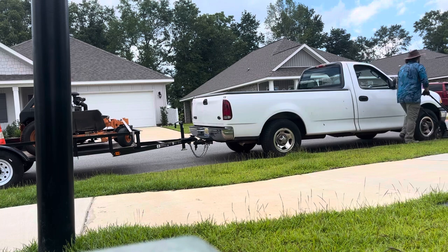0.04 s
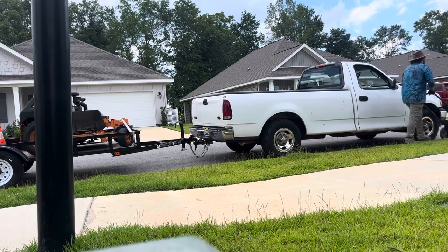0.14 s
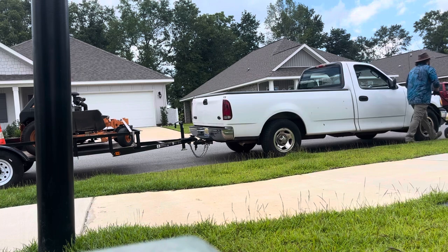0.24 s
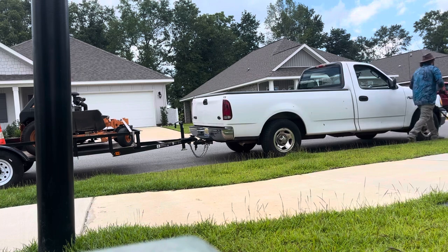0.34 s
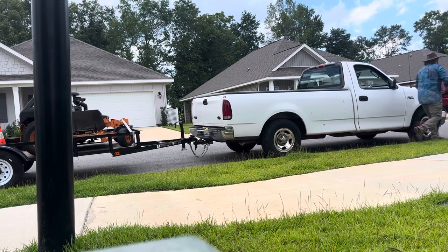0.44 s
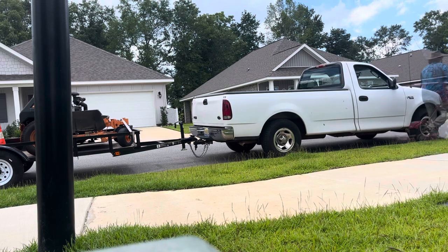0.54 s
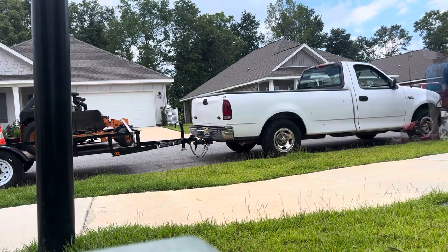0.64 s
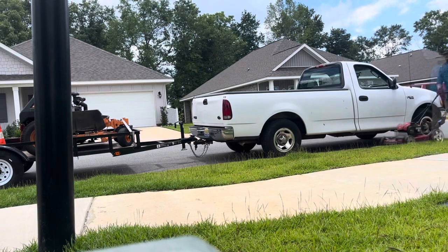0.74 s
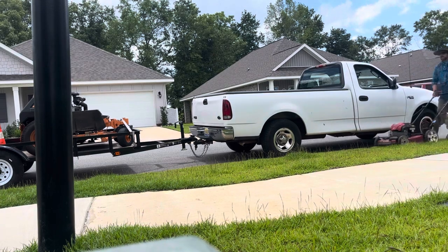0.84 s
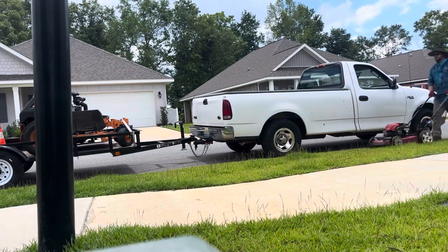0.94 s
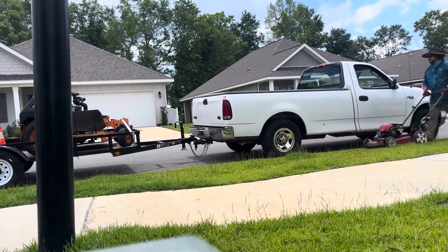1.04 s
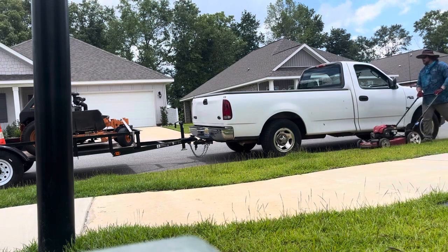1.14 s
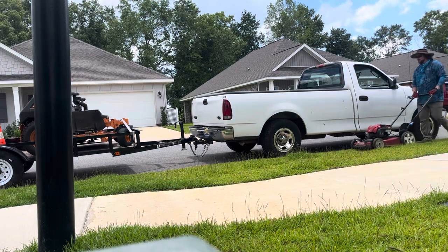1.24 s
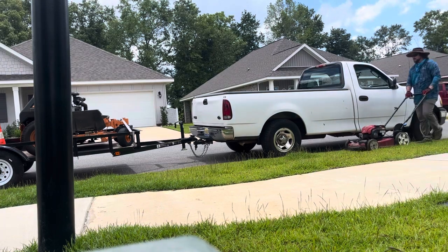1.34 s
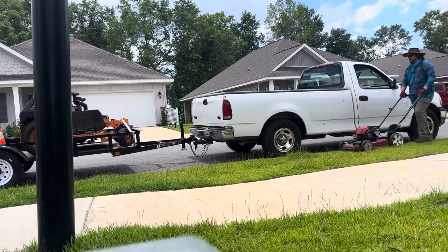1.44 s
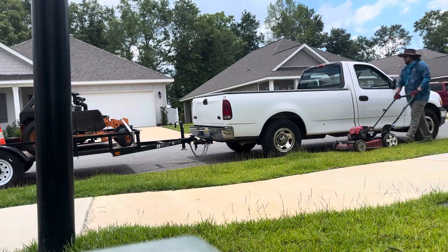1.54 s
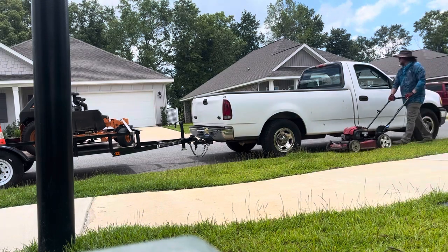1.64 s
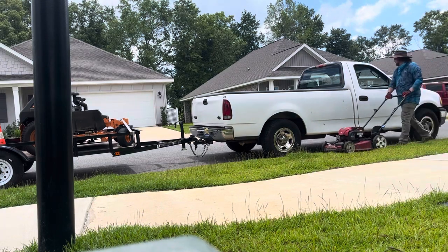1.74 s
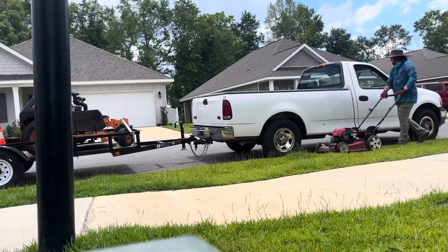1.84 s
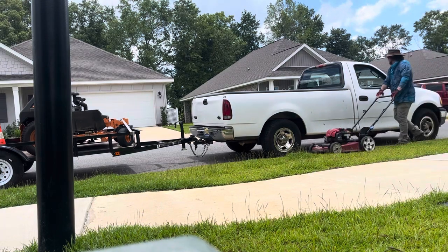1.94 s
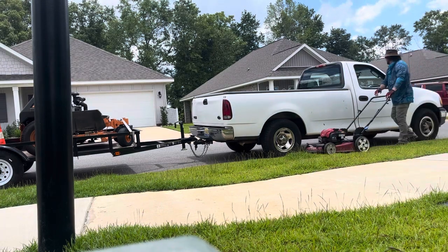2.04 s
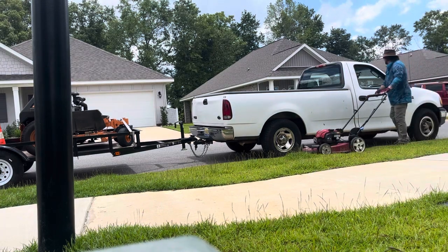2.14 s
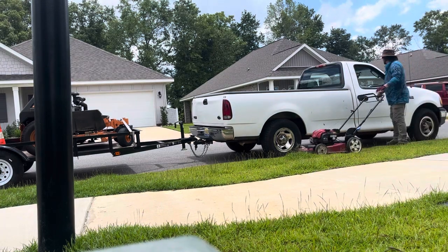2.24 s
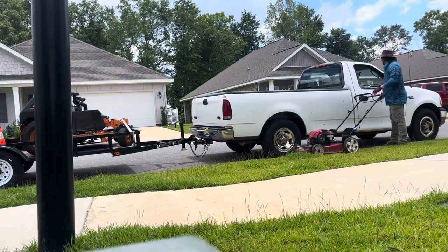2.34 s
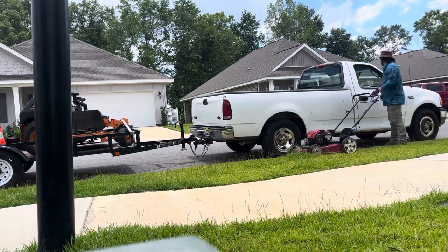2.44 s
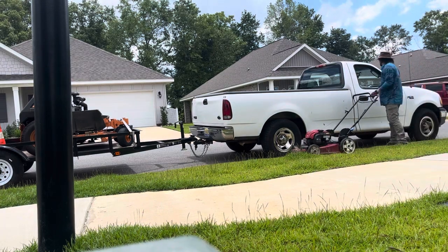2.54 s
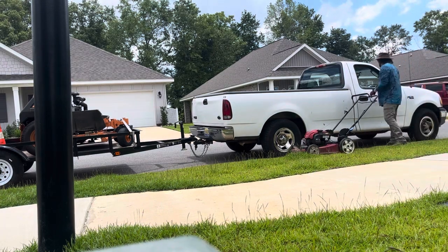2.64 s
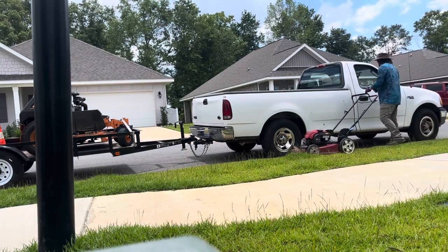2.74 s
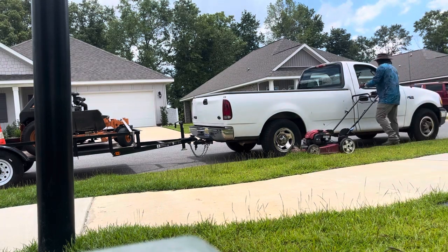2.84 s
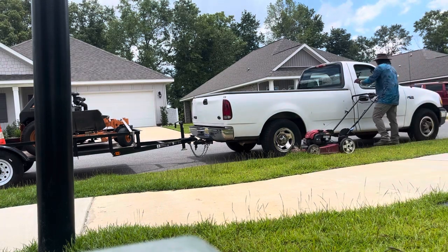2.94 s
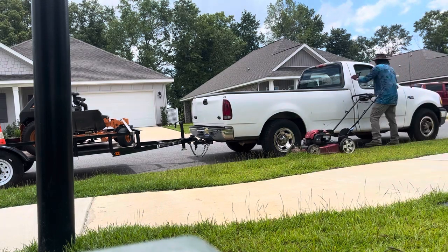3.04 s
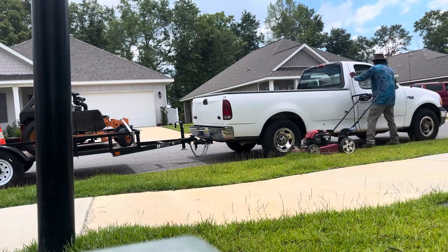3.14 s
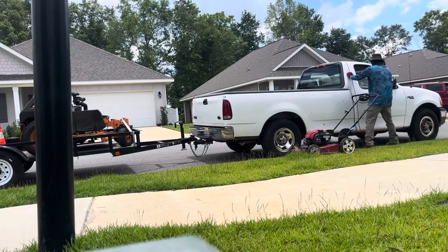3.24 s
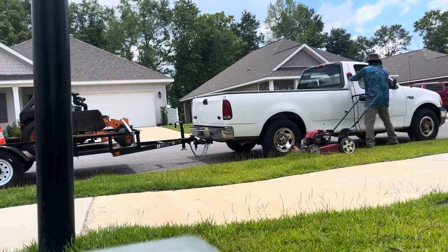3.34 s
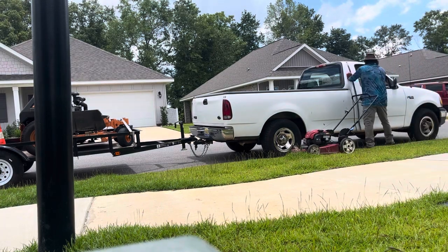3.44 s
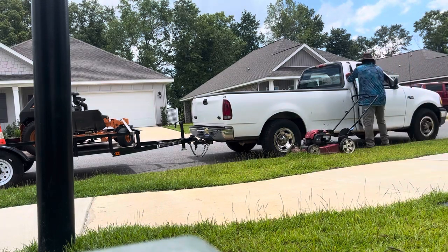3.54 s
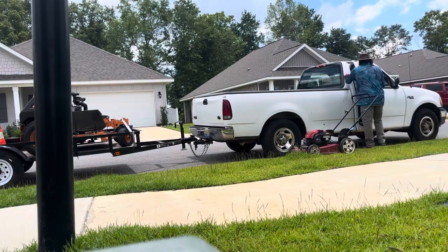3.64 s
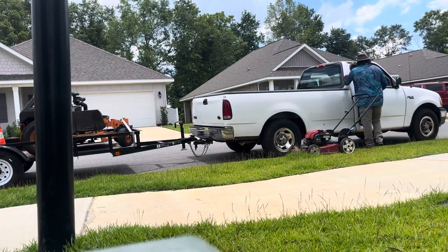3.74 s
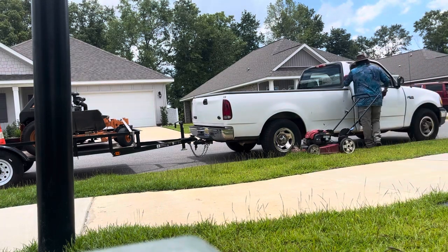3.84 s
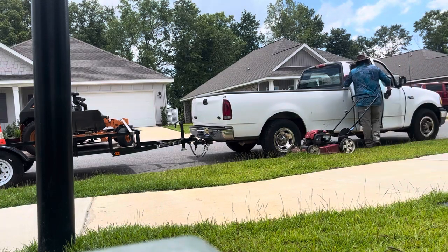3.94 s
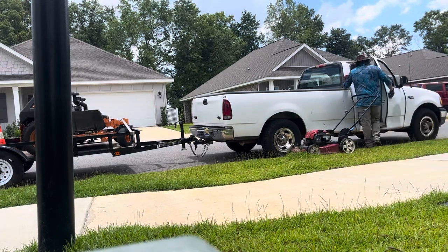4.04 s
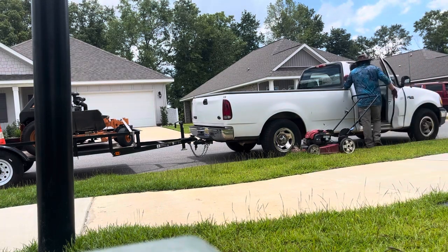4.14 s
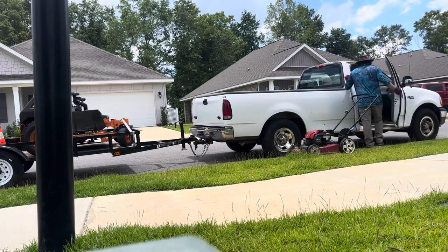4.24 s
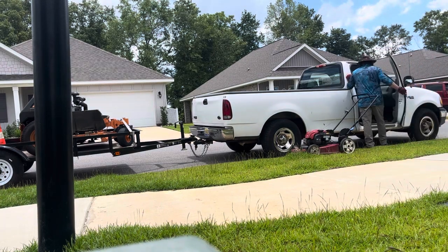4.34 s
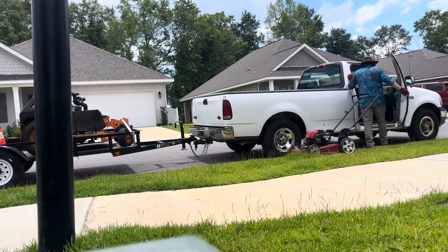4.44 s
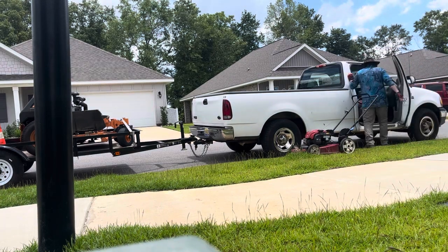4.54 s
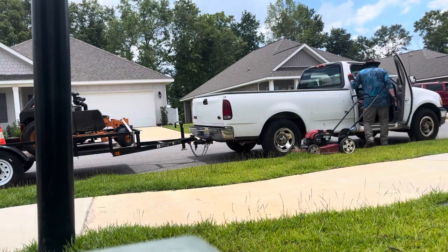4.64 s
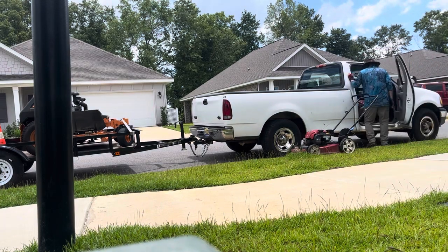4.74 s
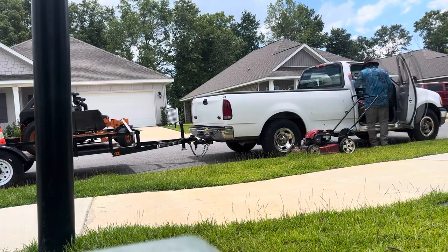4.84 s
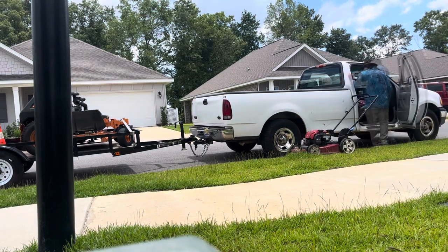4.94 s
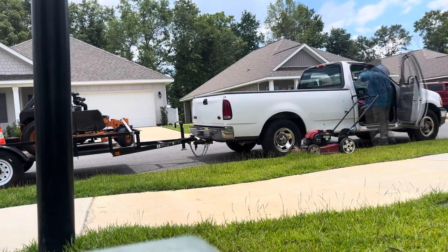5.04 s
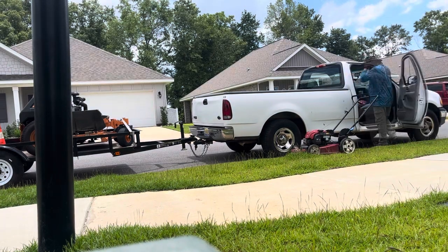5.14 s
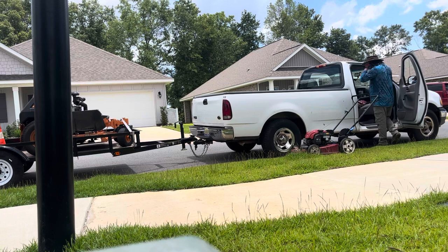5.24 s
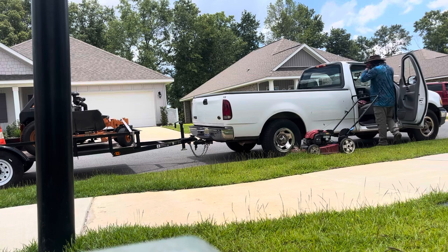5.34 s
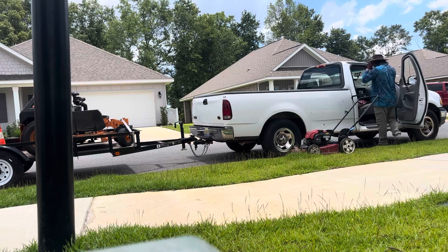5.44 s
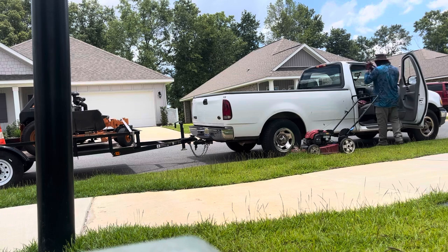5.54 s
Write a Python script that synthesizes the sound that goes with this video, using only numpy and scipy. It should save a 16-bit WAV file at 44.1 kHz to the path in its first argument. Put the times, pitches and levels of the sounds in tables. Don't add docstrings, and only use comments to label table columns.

```python
import sys
import numpy as np
from scipy import signal
from scipy.fft import rfft, irfft, next_fast_len
from scipy.io import wavfile
from scipy.ndimage import uniform_filter1d

SR = 44100
rng = np.random.default_rng(int(sys.argv[2]) if len(sys.argv) > 2 else 0)


def output_pcm(signal):
    pcm = np.clip(np.atleast_2d(signal).T, -1, 1) * 32767
    wavfile.write(sys.argv[1], SR, np.round(pcm).astype(np.int16))


def level_to_linear(level):
    exponent = np.asarray(level, float) / 20
    return 10 ** exponent


N = 246513
T = np.arange(N) / SR
SIZE = next_fast_len(N + SR // 10)
HZ = np.fft.rfftfreq(SIZE, 1 / SR)
CUT_AT, STOP_AT = 2.28, 3.38


def evened(x):
    return x / np.sqrt(np.mean(x ** 2) + 1e-20)


def read(points, hz):
    f, value = np.transpose(points)
    return np.interp(np.log(hz + 1), np.log(f + 1), value)


def colour(x, points):
    return irfft(rfft(x, SIZE) * level_to_linear(read(points, HZ)), SIZE)[:N]


def hiss(points, lo_hz, hi_hz):
    z = rfft(rng.standard_normal(SIZE)) * level_to_linear(read(points, HZ))
    band = z[(HZ > lo_hz) & (HZ < hi_hz)]
    inside = np.sqrt(2 * np.sum(abs(band) ** 2)) / SIZE
    return irfft(z / inside, SIZE)[:N]


def drift(top_hz):
    rate = 200
    coarse = rng.standard_normal(int(N / SR * rate) + 2)
    low_pass = signal.butter(2, np.clip(top_hz, .1, 90), fs=rate)
    smooth = evened(signal.filtfilt(*low_pass, coarse))
    return np.interp(T, np.arange(len(coarse)) / rate, 2.2 * np.tanh(smooth / 2))


def narrow(x, hz, width_hz):
    peak = signal.iirpeak(hz, hz / width_hz, SR)
    return evened(signal.lfilter(*peak, signal.lfilter(*peak, x)))


def ramp(at, length):
    return np.sin(np.pi / 2 * np.clip((T - at) / length + .5, 0, 1)) ** 2


def bump(cycles, place, length):
    since = (cycles - place) % 1
    return (1 - np.exp(-since / 0.0085)) * np.exp(-since / length)


# pitch_hz, level_db (per Hz)
STREET_SPECTRUM = [(20, -27), (39, -4), (62, -14), (160, -8), (250, -15.5), (400, -20.5), (630, -29.5),
                   (1000, -31.5), (2000, -38), (3200, -46.5), (5000, -43.5), (7000, -56.5), (10000, -52),
                   (14500, -70.5), (16000, -55)]
# pitch_hz, likeness (0-1)
STREET_LIKENESS = [(60, 0.92), (150, 0.92), (380, 0.6), (950, 0.016), (2380, 0.39), (5980, 0.048),
                   (15000, 0.42)]
# pitch_hz, left_minus_right_db
STREET_LEAN = [(60, -6), (130, 2.5), (290, 2), (640, 0), (1410, 1.5), (3100, -5.5), (6820, -7), (15000, 5)]


def traffic_wash():
    frames, hz = N // 512 + 5, np.fft.rfftfreq(2048, 1 / SR)
    a, b, c, d, patches = rng.standard_normal((frames, 1025, 5)).T
    patches = uniform_filter1d(patches, size=3, axis=0)
    patches = evened(uniform_filter1d(patches, size=16, axis=1))
    same = np.clip(read(STREET_LIKENESS, hz), -1, 1)[:, None]
    left = a + 1j * b
    right = same * left + np.sqrt(1 - same ** 2) * (c + 1j * d)
    lean_db = read(STREET_LEAN, hz)[:, None] / 2
    level_db = read(STREET_SPECTRUM, hz)[:, None] + 2.0 * patches
    z = np.array([left, right]) * level_to_linear(level_db + np.array([lean_db, -lean_db]))
    return evened(signal.istft(z, nperseg=2048, noverlap=1536)[1][:, :N])


# pitch_hz, level_db
IDLE_TONES = [(56, 3.5), (77, 3), (120, -1.5), (150, -16)]


def far_idle():
    idle = np.zeros(N)
    for hz, db in IDLE_TONES:
        idle += level_to_linear(db + 2.5 * drift(5)) * np.sin(2 * np.pi * hz * T + 1.2 * drift(4))
    return idle


def street():
    lull_at, swell_s = 5.06, 1.22
    swell_db = -1.5 * np.cos(2 * np.pi * (T - lull_at) / swell_s)
    return level_to_linear(-50.5 + 0.59 * swell_db) * traffic_wash() + level_to_linear(-50 + swell_db) * far_idle()


def insect():
    swell_db = 3.5 * np.exp(-((T - 4.3) / .5) ** 2)
    level = level_to_linear(-75.5 + swell_db + 1.5 * drift(8))
    trill = level * np.sin(2 * np.pi * 4160 * T + 0.76 * drift(25))
    return trill * np.array([[-.3], [1]])


# start_s, level_db
LATCH_CLICKS = [
    (3.9746, -34),
    (3.9773, -20.5),
]
# pitch_hz, level_db, t60_s
DOOR_MODES = [(196, -29.5, 0.22), (260, -34, 0.44), (281, -25, .15), (361, -36.5, 0.3), (453, -35.5, 0.21),
              (515, -29, 0.096)]
# pitch_hz, t60_s
BODY_DECAY = [(200, 0.82), (1000, 0.33), (3000, 0.26), (6000, 0.15), (11000, 0.2)]
# pitch_hz, level_db
CLICK_SPECTRUM = [(150, 10.5), (500, -1), (1200, -1), (2300, -5.5), (3500, -8.5), (5000, -13), (6500, -2),
                  (8000, -18), (11000, -20), (15000, -31)]


def latch():
    out = np.zeros(N)
    (tick_at, _), (catch_at, catch_db) = LATCH_CLICKS
    hz, after, z = signal.stft(rng.standard_normal(SR // 2), SR, nperseg=128)
    wash_db = read(CLICK_SPECTRUM, hz)[:, None] - 60 * after / read(BODY_DECAY, hz)[:, None]
    wash = signal.istft(z * level_to_linear(wash_db), SR, nperseg=128)[1]
    wash = wash / abs(wash).max()
    out[round(catch_at * SR):][:len(wash)] += level_to_linear(catch_db - 9 + 1.4 * drift(45)[:len(wash)]) * wash
    rebound_at, rebound_db = catch_at + .15, -19
    out[round(rebound_at * SR):][:len(wash)] += level_to_linear(catch_db - 8 + rebound_db) * wash

    rattle = hiss(CLICK_SPECTRUM, 1000, 11000)
    for s, db in LATCH_CLICKS:
        since = np.maximum(T - s, 0)
        out += level_to_linear(db - 7.5) * (1 - np.exp(-since / 0.00015)) * np.exp(-since / 0.0025) * rattle

    since = np.maximum(T - tick_at - .005, 0)
    for hz, db, t60 in DOOR_MODES:
        out += level_to_linear(db - 60 * since / t60) * (1 - np.exp(-since / 0.0048)) * np.sin(2 * np.pi * hz * since)
    return out


# start_s, rate_hz
BLADE_SPEED = [(0, 92.6), (.4, 94.45), (.85, 93.33), (1.05, 94.7), (1.4, 92.5), (1.7, 94.77), (1.95, 93.54),
               (2.15, 94.4)]


def spin():
    cut_hz, coast_s, friction_hz = 94.3, 1.6, 70
    coast_hz = (cut_hz + friction_hz) * np.exp((CUT_AT - T) / coast_s) - friction_hz
    at, hz = np.transpose(BLADE_SPEED + [(CUT_AT, cut_hz)])
    blade_hz = np.where(T < CUT_AT, np.interp(T, at, hz), np.maximum(coast_hz, 1))
    cycles = np.cumsum(blade_hz / 4) / SR
    return cycles - np.interp(CUT_AT, T, cycles), np.log2(cut_hz / blade_hz) * (T > CUT_AT)


def placed(hidden_db, nose_db, alongside_db, hidden_sign=1):
    out, along = ramp(0.81, 0.45), ramp(1.563, 0.13)
    in_view = (1 - along) * level_to_linear(nose_db) + along * level_to_linear(alongside_db)
    return (1 - out) * hidden_sign * level_to_linear(hidden_db) + out * in_view


def strokes(place):
    cycles, lost = spin()
    s = np.interp(np.arange(2, 14) + place, cycles, T)
    s = s[s < STOP_AT]
    uneven_db = 2.9 * rng.standard_normal(12)[:len(s)]
    return list(zip(s, -9 * np.interp(s, T, lost) + uneven_db))


# start_s, level_db (hiss peak), fizz_db and rumble_db (relative to it), length_s
STRAY_CLACKS = [
    (1.9764, -27, -15, 4, 0.02),
    (2.0238, -32.5, 3, 7.5, 0.015),
    (2.1016, -31, -17, -12, 0.094),
    (2.2858, -26.5, -5.5, 7, 0.054),
    (2.3756, -22.5, -21, 0, 0.0066),
    (3.1557, -32, -5, -7.5, 0.0089),
    (3.2759, -53, -14, -9, 0.044),
    (3.3802, -39.5, -20, -10.5, 0.0098),
    (3.3944, -55, -8, 4, 0.02),
]
# pitch_hz, level_db
PUFF_SPECTRUM = [(500, -26), (1000, -2.5), (1800, 0.5), (2800, 0), (5000, -13.5), (6500, -4), (8000, -40)]
# pitch_hz, level_db
RUMBLE_SPECTRUM = [(100, -17), (250, 20), (450, 9.5), (900, -13), (1500, -17), (3000, -10.5)]


def air_bursts(exhales, valves):
    air, rumble = hiss(PUFF_SPECTRUM, 1140, 6900), hiss(RUMBLE_SPECTRUM, 200, 910)
    fizz = colour(hiss(FIZZ_SPECTRUM, 9700, 11500), [(11000, 0), (13500, -13)])
    bursts = list(STRAY_CLACKS)
    bursts += [(s, -25.5 + db, -9, -.8, 0.021 * level_to_linear(-.25 * db)) for s, db in exhales]
    bursts += [(s, -48.5 + 0.36 * db, -3, -4, .018) for s, db in valves]
    out, since = np.zeros(N), T[:SR // 4]
    swell = since / 0.0021 * np.exp(1 - since / 0.005)
    for s, db, fizz_db, rumble_db, length in bursts:
        span = slice(round(s * SR), round(s * SR) + len(since))
        shape = (1 - np.exp(-since / max(0.15 * length, .0035))) * np.exp(-since / max(length, .004))
        blown = shape * (air[span] + level_to_linear(fizz_db - 2.0) * fizz[span])
        out[span] += level_to_linear(db - 7.5) * (blown + level_to_linear(rumble_db) * swell * rumble[span])
    return out


# start_s, level_db (peak), pitch_hz
LURCHES = [
    (2.941, -34, 226.7),
    (3.04, -34, 61),
    (3.16, -39, 182),
    (3.201, -37, 227),
    (3.219, -34.5, 82.8),
    (3.44, -38, 88.4),
    (4.45, -52, 290),
]
# pitch_hz, level_db
PISTON_REST = [(96, -31.5), (202, -37.5), (900, -60)]


def box_thumps(exhales, valves):
    thumps = list(LURCHES)
    thumps += [(s, -27 + db, 465.4) for s, db in valves]
    thumps += [(s, -21.5 + db, 127) for s, db in exhales]
    thumps += [(STOP_AT + 0.0099, db, hz) for hz, db in PISTON_REST]
    out, since = np.zeros(N), T[:SR // 4]
    swell = since / 0.005 * np.exp(1 - since / 0.0069)
    for s, db, hz in thumps:
        out[round(s * SR):][:len(since)] += level_to_linear(db) * swell * np.sin(2 * np.pi * hz * since)
    return out


def stop_shudder():
    after = np.maximum(T - STOP_AT, 0)
    return level_to_linear(-38) * (1 - np.exp(-after / 0.0085)) * np.exp(-after / 0.044) * hiss(ROAR_SPECTRUM, 340, 1500)


def puffs():
    exhales, valves = strokes(.914), strokes(.275)
    return air_bursts(exhales, valves) + box_thumps(exhales, valves) + stop_shudder()


# order (of the engine cycle), hidden_db, nose_db, alongside_db, cut_step_db
STRONG_TONES = [(3.994, -29, -19.5, -19.5, -2.5), (4.977, -31.5, -38, -30, -9), (5.99, -36, -32, -41.5, 11),
                (7.99, -30, -20, -24, 2), (11.98, -31.5, -34, -26.5, 4.5), (16.01, -37.5, -33, -35, 2.5),
                (20.19, -45, -39, -43, -3), (24.11, -41, -41, -42, -2)]
INVERTED_ORDERS = (5, 12)


def engine_drone(cycles, lost):
    drone = np.zeros(N)
    for order, *db, cut_db in STRONG_TONES:
        sign = 1 - 2 * (round(order) in INVERTED_ORDERS)
        level_db = ramp(CUT_AT + 0.039, 0.055) * cut_db - 15 * lost
        level_db += 0.014 * min(order, 15) ** 2 * drift(4.5) - 2.9 * lost * abs(drift(16))
        level = placed(*db, sign) * level_to_linear(level_db)
        drone -= np.sqrt(2) * level * np.cos(2 * np.pi * round(order) * cycles + 0.6 * drift(3.2))
    return drone


# order (of the engine cycle), level_db
WEAK_TONES = [(1, -38.5), (2, -20), (3, -22.5), (7, -34.5), (9, -18.5), (10, -29), (11, -21), (13, -33.5),
              (14, -52), (15, -51), (17, -23.5), (18, -15), (19, -22.5), (21, -21), (22, -34), (23, -22.5),
              (25, -28), (27, -24.5), (28, -33), (31, -47), (32, -22)]


def weak_overtones(cycles, gain, firing):
    tones, on = np.zeros(N), slice(0, 3 * SR)
    for order, db in WEAK_TONES:
        loose = .3 if round(order) % 4 == 0 else 1.1
        wander = 2 * np.pi * rng.random() + 0.6 * loose * drift(2.4)[on]
        level = (0.8 + 0.25 * firing[on]) * gain[on] * level_to_linear(db + 10.5 + 1.43 * loose * drift(3.6)[on])
        tones[on] += level * np.cos(2 * np.pi * round(order) * cycles[on] + wander)
    return tones


# pitch_hz, level_db
ROAR_SPECTRUM = [(30, -17), (60, -11), (120, 0.5), (250, 2), (450, -2), (800, -8), (1200, -13.5),
                 (1600, -25.5), (3000, -31.5), (6000, -60)]


def deck_roar(cycles):
    swish = level_to_linear(2.6 * np.cos(2 * np.pi * (4 * cycles - .4)) + 1.64 * drift(45))
    return level_to_linear(-1.5) * evened(swish) * hiss(ROAR_SPECTRUM, 312, 1500)


# pitch_hz, level_db
CHUFF_SPECTRUM = [(900, -46), (1300, -2), (2000, -1), (2600, -3), (3100, 2.5), (3600, -4), (4200, -2.5),
                  (5200, -4.5), (6500, -4), (8000, -24)]


def exhaust_chuff(cycles, firing, stroke_db):
    blow = 1 + firing * 1.06 * level_to_linear(stroke_db) * bump(cycles, 0, 0.19)
    return level_to_linear(-6.5 + 0.96 * drift(39)) * blow * hiss(CHUFF_SPECTRUM, 1850, 4700)


# pitch_hz, level_db
FIZZ_SPECTRUM = [(4500, -39), (6000, -0.5), (7500, 0), (9000, 2), (10500, -1.5), (12000, 0), (14000, -5),
                 (15500, -9), (17000, -24)]
# place (in cycle), level_db, length (in cycles)
VALVE_TICKS = [
    (.02, 13, 0.035),
    (.3, 11.5, 0.074),
    (.62, 8.5, 0.037),
]


def shroud_fizz(cycles, firing):
    ticks_db = firing * sum(1.1 * db * bump(cycles, place, length) for place, db, length in VALVE_TICKS)
    return level_to_linear(-2.5 + ticks_db + 0.93 * drift(40)) * hiss(FIZZ_SPECTRUM, 6950, 11100)


# pitch_hz, width_hz, place (in cycle), steady (share)
METAL_RINGS = [(2268, 110, 0.256, 0.084), (2620, 950, 0.121, 0.15), (4127, 75, 0.014, 0.05)]
# start_s, half_length_s, level_db
RING_FLARES = [
    (0.26, 0.042, 13.5),
    (1.636, 0.094, 5.5),
    (1.81, 0.091, 6),
]
# hidden_db, nose_db, alongside_db
RING_LEVELS = [(-51.5, -59, -65), (-60, -45, -46), (-90, -59.5, -63)]


def metal_rings(cycles, stroke_db):
    rings = np.zeros(N)
    for (hz, width, place, steady), (s, half, flare_db), db in zip(METAL_RINGS, RING_FLARES, RING_LEVELS):
        knock_db = 0.78 * stroke_db + flare_db * np.exp(-((T - s) / half) ** 2)
        knock = (steady + bump(cycles, place, 0.089) * level_to_linear(knock_db)) * rng.standard_normal(N)
        rings += placed(*db) * narrow(knock, hz, width)
    return rings


# hidden_db, nose_db, alongside_db, fall_db (per octave of speed lost)
AIR_LEVELS = [(-36, -29, -28.5, 11.5), (-46.5, -42, -42, 10), (-52, -44.5, -43, 15.5)]


def mower():
    cycles, lost = spin()
    squeeze = np.cos(2 * np.pi * (cycles - .4))
    cycles = cycles - np.interp(1.503, T, cycles)
    roar_gain, chuff_gain, fizz_gain = [placed(*db) * level_to_linear(-fall_db * lost) for *db, fall_db in AIR_LEVELS]
    turning = np.clip((2.99 - T) / 0.085, 0, 1)
    firing = np.clip((CUT_AT + 0.21 - T) / 0.059, 0, 1)
    alive = np.clip((STOP_AT + 0.24 - T) / 0.093, 0, 1)
    stroke_db = 2.4 * rng.standard_normal(200)[np.floor(cycles).astype(int) + 60]

    tones = engine_drone(cycles, lost) + weak_overtones(cycles, roar_gain, firing)
    air = roar_gain * deck_roar(cycles)
    air += chuff_gain * exhaust_chuff(cycles, firing, stroke_db)
    air += fizz_gain * shroud_fizz(cycles, firing)
    rings = firing * metal_rings(cycles, stroke_db)
    labour = level_to_linear((1 - firing) * (2.3 * squeeze + 1.3 * drift(30) + 0.1))
    return turning * labour * tones + alive * (air + rings)


# pitch_hz, left_lead_radians
PORT_PHASE = [(0, 0), (100, -.11), (200, -.24), (500, -.42), (1000, -.65), (2150, -1.1), (3270, -1.7),
              (4390, -.1), (5080, .6), (5800, 2.8), (7100, 3.3), (7670, 6), (10300, 6.9), (11700, 9.3),
              (13700, 9.5), (14500, 12.4)]
# pitch_hz, left_minus_right_db
PORT_LEAN = [(100, 0), (250, -1.7), (700, -3), (1300, -4), (2400, -4.4), (4400, -4.8), (6000, 0),
             (15000, 0)]
# pitch_hz, level_db
ECHO_SPECTRUM = [(60, -30), (250, -22), (700, -11), (2000, -6), (4500, -5), (6000, -12), (8000, -10),
                 (15000, -10)]


def ports(x, echo_db):
    half = level_to_linear(read(PORT_LEAN, HZ) / 2) * np.exp(.5j * np.interp(HZ, *np.transpose(PORT_PHASE)))
    direct = irfft(rfft(x, SIZE) * np.array([half, 1 / half]), SIZE)[:, :N]
    after = T[:12000]
    echo = rng.standard_normal((2, 12000)) * level_to_linear(-60 * after / .25) * (after > .004)
    echo = echo / np.linalg.norm(echo[0])
    scattered = signal.oaconvolve(colour(x, ECHO_SPECTRUM)[None], echo, axes=1)
    return direct + level_to_linear(echo_db) * scattered[:, :N]


def scene():
    door = ports(latch(), echo_db=-9)
    return street() + insect() + door + ports(mower() + puffs(), echo_db=2)


def top_cut(x):
    return signal.sosfilt(signal.butter(12, 16240, fs=SR, output="sos"), x)


# low_hz, high_hz
SUM_HOLE = (11750, 13700)
# low_hz, high_hz
DIFFERENCE_HOLES = [(8000, 9750), (14800, 16300)]
# low_hz, high_hz
FLICKER_BANDS = [(5850, 6200), (6200, 6550), (6550, 7050), (11350, 11750), (13700, 14100)]


def record(dry):
    total, difference = rfft(dry[0] + dry[1], SIZE) / 2, rfft(dry[0] - dry[1], SIZE) / 2
    total = total * np.clip(np.maximum(SUM_HOLE[0] - HZ, HZ - SUM_HOLE[1]) / 150, .003, 1)
    total = total * (HZ < 15900)
    for lo_hz, hi_hz in DIFFERENCE_HOLES:
        difference = difference * np.clip(np.maximum(lo_hz - HZ, HZ - hi_hz) / 150, .03, 1)
    kept = irfft(np.array([total + difference, total - difference]), SIZE)[:, :N]
    for lo_hz, hi_hz in FLICKER_BANDS:
        dropped = np.clip(3 * drift(12) + .2, 0, 1) * (T < STOP_AT + .15)
        kept = kept - dropped * irfft(total * ((HZ > lo_hz) & (HZ < hi_hz)), SIZE)[:N]
    return top_cut(kept)


dry = scene()
out = record(dry)
output_pcm(out)
```